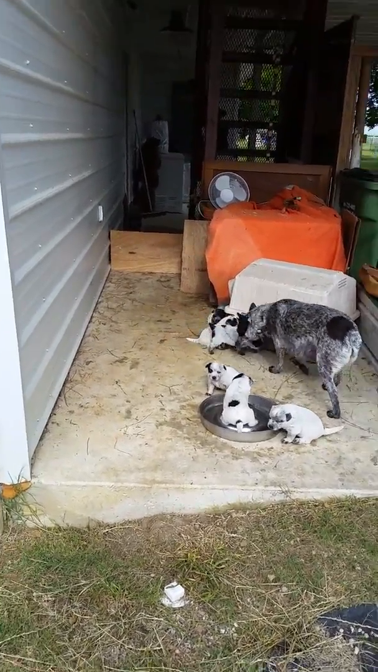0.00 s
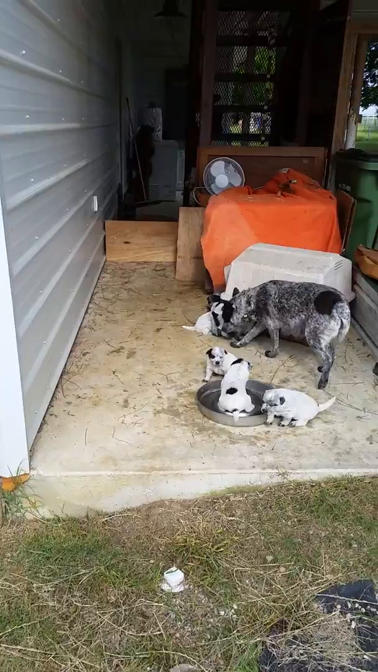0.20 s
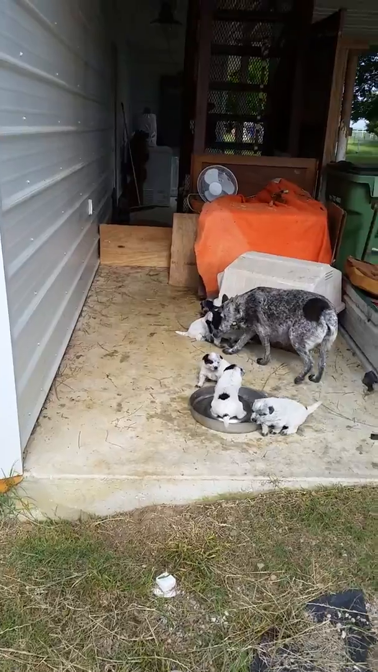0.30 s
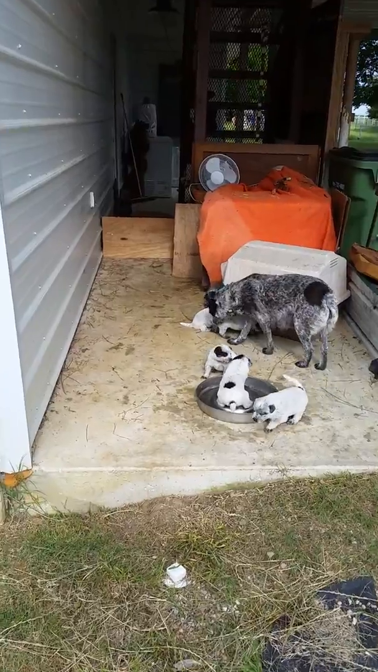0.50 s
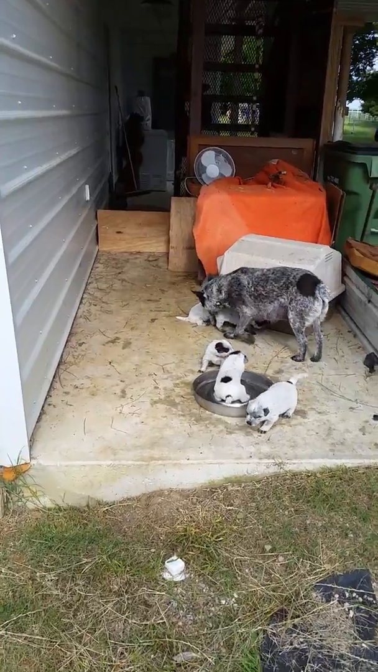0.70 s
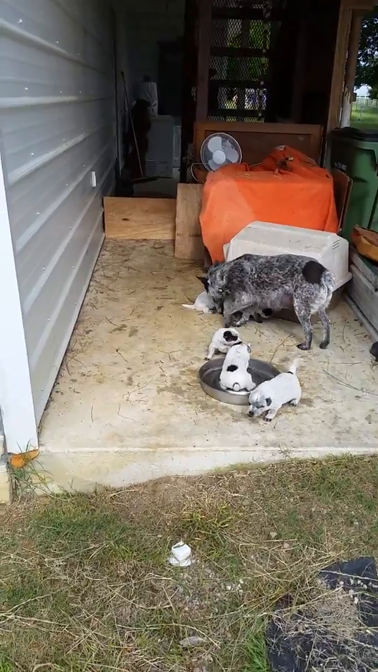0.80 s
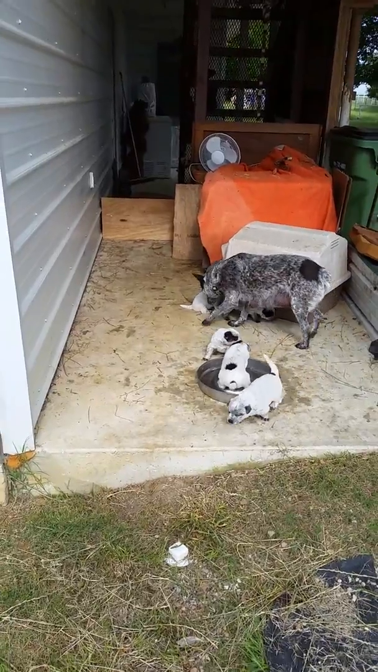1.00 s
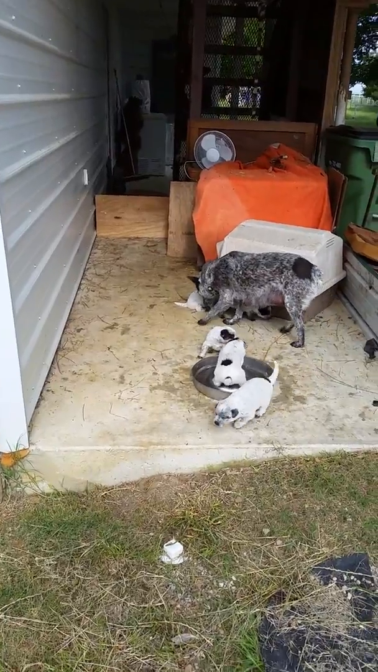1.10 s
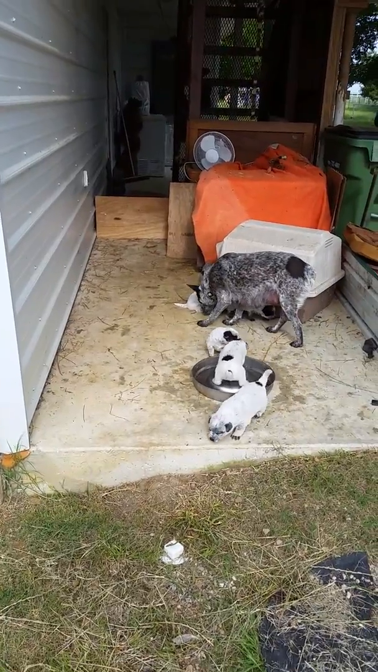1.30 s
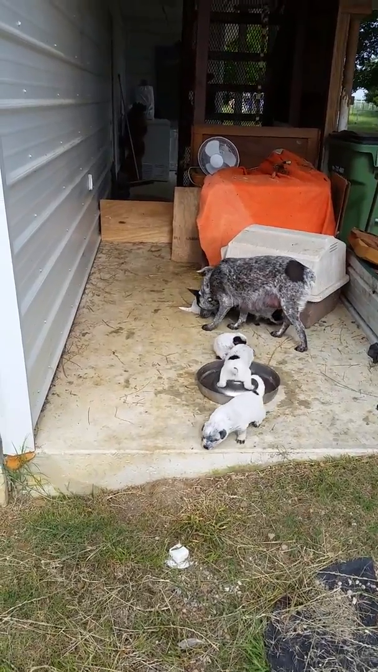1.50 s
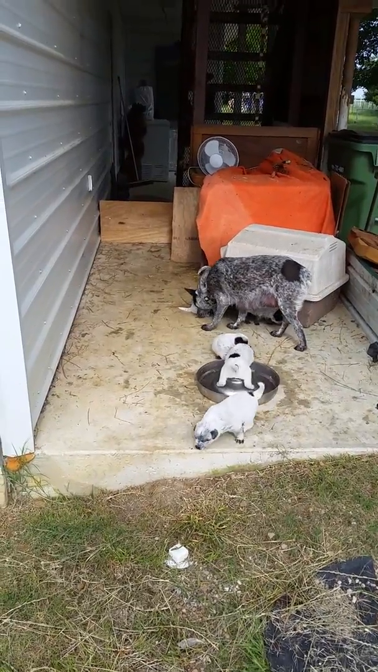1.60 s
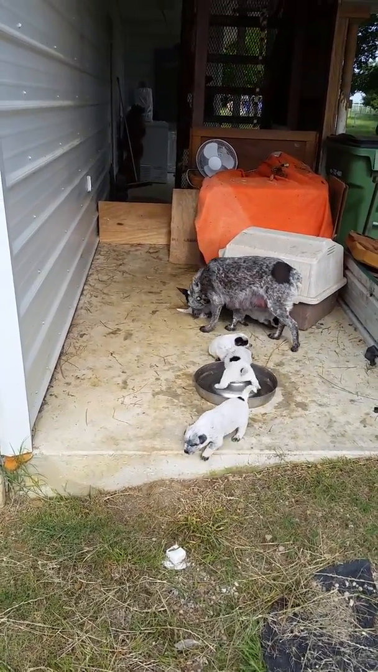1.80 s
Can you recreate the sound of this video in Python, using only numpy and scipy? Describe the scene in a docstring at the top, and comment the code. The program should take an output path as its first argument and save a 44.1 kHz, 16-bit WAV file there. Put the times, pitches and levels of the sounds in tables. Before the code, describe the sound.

Wind buffets the microphone outside an open shed. Separate low thumps from 0.1 seconds, with a faint airy whistle and bird peep near 0.3 to 0.4, crowd into a loud, growling rumble and hiss at 0.57 to 0.85. It drops away by 1.0. Faint puppy squeaks follow at 1.0, 1.08, 1.34 and 1.56, with soft bumps, a brief low hum near 1.4, and a distant bird sliding upward from 1.6.

```python
"""A puff of wind at a microphone outside an open shed

Turbulent eddies strike the microphone as paired pressure swings: thumps that crowd into a ragged rumble.
Shaped noise adds a hiss that swells with the air; narrow noise bands whistle briefly, and low tones growl.
A distant bird peeps early on. Afterwards puppies give four faint squeaks, made of gliding sines, soft bumps
and a low hum sound, and a bird slides upward over the steady noise murmur of the yard.
"""
import sys
import numpy as np
from scipy import signal
from scipy.fft import rfft, irfft
from scipy.io import wavfile

SR = 44100
rng = np.random.default_rng(int(sys.argv[2]) if len(sys.argv) > 2 else 0)


def store_pcm(level_fs):
    """Save levels as 16-bit WAV."""
    pcm = np.round(np.clip(level_fs, -1, 1) * 32767).astype(np.int16)
    wavfile.write(sys.argv[1], SR, np.atleast_2d(pcm).T)


N = 79380
TIME = np.arange(N) / SR
FREQS = np.maximum(np.fft.rfftfreq(N, 1 / SR), 1)

# Eddies hitting the microphone: (time [s], level before scaling [dB], scale: push first + / pull first - [ratio],
# half-width [ms], edge level relative to the swing [dB], left lag [ms])
EDDIES = [(0.1195, -27.5, 0.71, 1, -48, 0.74), (0.201, -18.5, 0.89, 0.58, -26, 0.89),
          (0.2264, -24, 0.94, 0.68, -31, 0.97), (0.3222, -15.5, 0.79, 0.62, -36.5, .8),
          (0.3349, -16.5, 0.81, 0.53, -22.5, 0.81), (0.4763, -23, 0.98, 0.78, -24.5, 0.45),
          (0.5729, -12.5, 1, 0.5, -19, 0.95), (0.5956, -7.5, 0.54, 0.48, -18, 0.86),
          (0.6165, -15, 0.95, 0.564, -12.5, 1), (0.642, -17, -1.1, 2.4, -27.5, 1),
          (0.6833, -10, -0.87, 0.5, -13.5, 0.94), (0.7909, -11, -0.026, 0.41, -15, 0.78)]
EDGE_BAND_HZ, EDGE_PAN_DB = (830, 1460), 1
PORT_LOW_HZ, LEFT_LOW_HZ, LEFT_SWING_DB = 44, 102, -4.5
WAKE_HZ, WAKE_T60_S, WAKE_DB = 108, 0.015, -2.5

# Turbulence strength: (time [s], gain below the split [dB], gain above the split [dB])
GUST_LEVEL = [(0, -38.5, -36), (.16, -46, -53.5), (.31, -44.5, -47.5), (.34, -29, -34), (0.421, -43.5, -44),
              (0.471, -26, -38), (0.518, -23, -28.5), (0.564, -32.5, -30.5), (.586, -20.5, -25.5),
              (0.602, -15.5, -8.5), (.626, -14, -8.5), (.644, -9.5, -3.5), (0.659, -0.5, -0.5),
              (0.699, -14, -11), (0.747, -3, 2.5), (0.784, -6, 1), (0.805, -13.5, -5), (.855, -22, -17),
              (0.887, -19.5, -13), (0.921, -35, -31.5), (1.04, -58, -31), (1.3, -62, -69)]
# Turbulence spectrum before that gain: (frequency [Hz], left density [dB per Hz], right density [dB per Hz])
RUMBLE_SPECTRUM = [(30, -86.5, -74), (84.5, -73, -50), (171, -57.5, -41.5), (313, -45, -49),
                   (550, -52.5, -45), (679, -51, -50.5), (790, -56, -59), (900, -55.5, -60.5),
                   (1065, -61, -65), (1400, -67, -68), (1560, -69, -70.5), (1880, -71.5, -72),
                   (2040, -87.5, -84.5), (3630, -97.5, -88), (5000, -104, -103), (7000, -108, -106),
                   (8300, -135, -128)]
SPLIT_HZ, RUMBLE_LAG_S, RUMBLE_SHARED = 760, 0.00088, 0.93
RAGGED_DB, RAGGED_HZ = 2.5, 90

# Growls of eddies shed in quick succession, one list each: (time [s], frequency [Hz], level [dB])
GROWLS = [
    [(.685, 160.6, -44), (.71, 194.6, -26), (.728, 227.6, -19.5), (.745, 305, -19), (.765, 323.5, -18.5),
     (.785, 328, -26.5), (.81, 321.4, -33), (.86, 318, -46)],
    [(.735, 560, -44), (.762, 508.5, -23.5), (.778, 471, -16), (.795, 491, -28), (.808, 456, -50.5)],
    [(.64, 557, -51), (.656, 570, -18), (.675, 540, -45)],
    [(.768, 147.1, -39.5), (.79, 121.7, -22), (.806, 120, -42)],
]
GROWL_WIDTH_HZ, GROWL_PAN_DB = 14, -4

# Airy hiss: (time [s], gain [dB])
HISS_LEVEL = [(0, 5.5), (.07, 7), (.18, 2), (.24, 3.5), (.33, 12), (.45, 7), (.57, 7), (.65, 13.5),
              (.70, 13.5), (.76, 17.5), (.87, 14), (1.0, 9), (1.11, 5), (1.19, 8), (1.27, 1.5),
              (1.52, -3.5), (1.66, -1), (1.8, 1)]
# Hiss spectrum before that gain: (frequency [Hz], left density [dB per Hz], right density [dB per Hz])
HISS_SPECTRUM = [(300, -116, -116), (1450, -108, -116), (2350, -112, -120), (3100, -117, -126),
                 (3880, -115, -126), (4770, -104, -125), (5740, -111, -129), (6690, -105, -128),
                 (7245, -115, -130), (8140, -139, -138), (10500, -135, -136), (11750, -124, -128),
                 (15000, -122, -126)]

# Breathy falling whistle: (time [s], frequency [Hz], level [dB])
AIR_WHISTLE = [(.24, 4700, -85.5), (.258, 4584, -64), (.285, 4043, -64.5), (.305, 3980, -58.5),
               (.325, 3500, -65), (.345, 3230, -63), (.365, 3005, -70.5), (.39, 2660, -92)]
# Thin high whistle: (time [s], frequency [Hz], level [dB])
THIN_WHISTLE = [(.285, 13000, -89), (.32, 14260, -76), (.345, 14440, -72), (.37, 14060, -66.5),
                (.39, 14260, -73.5), (.41, 14270, -78), (.50, 14250, -98)]
# Spray of hiss above the falling whistle: (time [s], gain [dB])
SPRAY_LEVEL = [(.235, -100), (.258, -70), (.29, -65.5), (.36, -84), (.42, -105), (.5, -120)]

# Tiny ticks: (time [s], level before colouring [dB], left minus right [dB])
TICKS = [(.448, -54, 11), (.521, -54.5, 5), (.5952, -45.5, -13), (.620, -54, -9.5), (1.175, -72, 17)]
# Tick colour: (frequency [Hz], gain [dB])
TICK_COLOUR = [(2000, -26), (4500, -4), (7000, -13), (8500, -26.5), (11500, -1.5), (15500, -1)]
TICK_DECAY_S = 0.00065

# Puppy squeaks: (start [s], length [s], first frequency [Hz], last frequency [Hz], level [dB])
SQUEAKS = [(1.005, 0.0444, 800, 1322, -57), (1.077, 0.049, 1090, 1105, -62), (1.341, 0.037, 992, 994, -69),
           (1.559, 0.037, 970, 1008, -69.5)]
SQUEAK_OVERTONE_DB, SQUEAK_PAN_DB, SQUEAK_ROUGH_DB = -15, 5, 2
# Soft low bumps: (time [s], level [dB])
BUMPS = [(1.02, -35), (1.191, -43.5)]
BUMP_HZ, BUMP_T60_S, BUMP_ATTACK_S = 209, 0.029, 0.0031

# Rising bird call: (time [s], frequency [Hz], level [dB])
BIRD_SLIDE = [(1.61, 2100, -92), (1.69, 2360, -84.5), (1.715, 2560, -85), (1.745, 2790, -78),
              (1.785, 2860, -76.5), (1.83, 3200, -68)]
# Short bird peep: (time [s], frequency [Hz], level [dB])
BIRD_PEEP = [(.375, 1980, -90), (.388, 1794, -61.5), (.404, 1780, -81)]
ECHO_T60_S, ECHO_DB = 0.64, -10

# Brief low hum: (time [s], frequency [Hz], level [dB])
LOW_HUM = [(1.37, 235, -79), (1.41, 238, -59.5), (1.45, 233.6, -66), (1.51, 237, -75), (1.56, 234, -81)]
# Still air in the yard: (frequency [Hz], left density [dB per Hz], right density [dB per Hz])
YARD_SPECTRUM = [(25, -77, -95), (67, -82, -73.5), (129.6, -81.5, -77), (195, -87, -100.5),
                 (229, -86.5, -82.5), (310, -93.5, -97), (600, -101, -107), (1100, -106, -112),
                 (1400, -102, -111), (1830, -112, -118), (3020, -126, -130), (8000, -142, -137)]
CUTOFF_HZ = 15900


def from_db(db):
    """Decibel definition: an amplitude ratio is ten to the power dB / 20."""
    return 10 ** (np.asarray(db) / 20)


def butter(x, hz, kind, order=2):
    """Butterworth filtering: a maximally flat passband."""
    return signal.sosfilt(signal.butter(order, hz, kind, fs=SR, output="sos"), x)


def panned(x, pan_db):
    """Level-difference stereo: left is louder than right by pan_db."""
    return x * from_db([[pan_db / 2], [-pan_db / 2]])


def drift(corner_hz):
    """Random modulation: low-passed noise scaled to unit RMS."""
    x = irfft(rfft(rng.standard_normal(N)) / (1 + (FREQS / corner_hz) ** 2), N)
    return x / np.sqrt(np.mean(x ** 2) + 1e-20)


def level(times, db):
    """Envelope: gain interpolated linearly in decibels."""
    return from_db(np.interp(TIME, times, db))


def decay(age, t60_s):
    """Exponential damping: a fall of 60 dB in t60_s."""
    return np.exp(-np.log(1000) * age / t60_s)


def coloured(white, spectrum):
    """Spectral shaping: two white noises take a left and a right power density."""
    hz, *sides = np.transpose(spectrum)
    gains = from_db([np.interp(np.log(FREQS), np.log(hz), side) for side in sides])
    return irfft(rfft(white) * gains, N) * np.sqrt(SR / 2)


def whistle(points, width_hz, noisy, pan_db):
    """Modulated carrier: a gliding tone, from pure (noisy 0) to a noise band around the pitch (noisy 1)."""
    times, hz, db = np.transpose(points)
    carrier = np.exp(2j * np.pi * np.cumsum(np.interp(TIME, times, hz)) / SR)
    flutter = np.array([drift(width_hz) + 1j * drift(width_hz) for side in range(2)])
    tone = np.real(carrier * (np.sqrt(2 * (1 - noisy)) + np.sqrt(noisy) * flutter))
    sounding = (TIME > times[0]) * (TIME < times[-1])
    return panned(tone * level(times, db) * sounding, pan_db)


def eddies():
    """Pressure dipole: each eddy pushes and pulls, with a sharper edge and a low wake, right port first."""
    out = np.zeros((2, N))
    for time, db, sign, width_ms, edge_db, lag_ms in EDDIES:
        age = TIME - time - np.array([[lag_ms], [0]]) / 1000
        u = age * 1000 / width_ms
        after = np.maximum(age, 0)
        wake = np.sin(2 * np.pi * WAKE_HZ * after) * decay(after, WAKE_T60_S)
        # Derivative of a Gaussian, with extremes of 1 at u = -1 and u = 1
        swing = -u * np.exp((1 - u * u) / 2) - from_db(WAKE_DB) * wake
        swing[0] = from_db(LEFT_SWING_DB) * butter(swing[0], LEFT_LOW_HZ, "high", order=1)
        # The edge comes just ahead of the swing
        edge = butter(np.exp(-(4 * (u + 3)) ** 2), EDGE_BAND_HZ, "band", order=5)
        edge *= from_db(edge_db) / np.abs(edge).max()
        out += sign * from_db(db) * (swing + panned(edge, EDGE_PAN_DB))
    return butter(out, PORT_LOW_HZ, "high", order=1)


def gust():
    """Partial coherence: ragged turbulence mostly shared by the two ports, a little later on the left."""
    right, own = rng.standard_normal((2, N))
    shared = RUMBLE_SHARED / np.sqrt(1 + (FREQS / 2200) ** 4)
    lag = np.exp(-2j * np.pi * FREQS * RUMBLE_LAG_S)
    left = irfft(shared * rfft(right) * lag + np.sqrt(1 - shared ** 2) * rfft(own), N)
    rumble = coloured(np.array([left, right]), RUMBLE_SPECTRUM)
    low = irfft(rfft(rumble) / (1 + (FREQS / SPLIT_HZ) ** 6), N)
    high = rumble - low
    times, low_db, high_db = np.transpose(GUST_LEVEL)
    blown = low * level(times, low_db) + high * level(times, high_db)
    return blown * from_db(RAGGED_DB * drift(RAGGED_HZ))


def growl():
    """Periodic eddy shedding: unsteady low tones stand out as the gust peaks."""
    right = np.zeros(N)
    for points in GROWLS:
        times, hz, db = np.transpose(points)
        pitch = np.interp(TIME, times, hz) + GROWL_WIDTH_HZ * drift(60)
        tone = np.sin(2 * np.pi * np.cumsum(pitch) / SR)
        unsteady = from_db(2.5 * drift(66))
        right += tone * level(times, db) * unsteady * (TIME > times[0]) * (TIME < times[-1])
    left = np.interp(TIME - RUMBLE_LAG_S, TIME, right)
    return panned(np.array([left, right]), GROWL_PAN_DB)


def hiss():
    """Broadband flow noise: a smooth hiss swells with the breeze."""
    return coloured(rng.standard_normal((2, N)), HISS_SPECTRUM) * level(*np.transpose(HISS_LEVEL))


def wind_whistles():
    """Narrow-band noise: a breathy falling whistle under a spray of hiss, then a very thin high one."""
    falling = whistle(AIR_WHISTLE, width_hz=340, noisy=1.0, pan_db=20.5)
    falling = butter(falling, 6500, "low", order=6)
    spray = butter(rng.standard_normal(N), (4300, 7000), "band", order=8)
    spray *= level(*np.transpose(SPRAY_LEVEL))
    thin = whistle(THIN_WHISTLE, width_hz=90, noisy=1.0, pan_db=17)
    return falling + panned(spray, 31) + thin


def ticks():
    """Impulsive noise: very short bright specks start at once and decay exponentially."""
    out = np.zeros((2, N))
    for time, db, pan_db in TICKS:
        fade = (TIME >= time) * np.exp(-np.abs(TIME - time) / TICK_DECAY_S)
        out += panned(from_db(db) * fade * rng.standard_normal((2, N)), pan_db)
    hz, db = np.transpose(TICK_COLOUR)
    return irfft(rfft(out) * from_db(np.interp(np.log(FREQS), np.log(hz), db)), N)


def squeaks():
    """Harmonic voice: a short gliding fundamental with a weak octave, roughened in pitch and level."""
    out = np.zeros(N)
    for start, length, first_hz, last_hz, db in SQUEAKS:
        u = np.clip((TIME - start) / length, 0, 1)
        pitch = (first_hz + (last_hz - first_hz) * u) * (1 + 0.0233 * drift(131))
        phase = 2 * np.pi * np.cumsum(pitch) / SR
        voice = np.sin(phase) + from_db(SQUEAK_OVERTONE_DB) * np.sin(2 * phase)
        out += from_db(db + SQUEAK_ROUGH_DB * drift(120)) * np.sin(np.pi * u) * voice
    return panned(out, SQUEAK_PAN_DB)


def bumps():
    """Damped oscillation: a low sine with a soft onset dies away exponentially."""
    out = np.zeros(N)
    for time, db in BUMPS:
        age = np.maximum(TIME - time, 0)
        onset = 1 - np.exp(-age / BUMP_ATTACK_S)
        out += from_db(db) * np.sin(2 * np.pi * BUMP_HZ * age) * decay(age, BUMP_T60_S) * onset
    return panned(out, SQUEAK_PAN_DB)


def birds():
    """Frequency glide: far, nearly pure notes, one peep and one upward slide."""
    slide = whistle(BIRD_SLIDE, width_hz=75, noisy=0.35, pan_db=9)
    return slide + whistle(BIRD_PEEP, width_hz=70, noisy=0.35, pan_db=4.5)


def shed(x):
    """Diffuse reverberation: convolution with decaying noise of unit energy adds the shed's short echo."""
    tail = rng.standard_normal((2, N)) * decay(TIME, ECHO_T60_S)
    tail /= np.sqrt(np.sum(tail ** 2, axis=1, keepdims=True))
    return x + from_db(ECHO_DB) * signal.fftconvolve(x, tail, axes=1)[:, :N]


def low_hum():
    """Partly coherent tone: a steady sine and a narrow noise band share one low pitch."""
    return whistle(LOW_HUM, width_hz=11, noisy=0.5, pan_db=4)


def yard():
    """Stationary background noise: the steady murmur of still air in the yard."""
    return coloured(rng.standard_normal((2, N)), YARD_SPECTRUM)


def scene():
    """Superposition: the pressures of all sources add, the whistles and birds with the shed's echo."""
    wind = eddies() + gust() + growl() + hiss()
    echoed = shed(wind_whistles() + birds())
    return wind + echoed + ticks() + squeaks() + bumps() + low_hum() + yard()


def record(dry):
    """Band limitation: a steep elliptic low-pass cuts the top."""
    return signal.sosfilt(signal.ellip(10, .1, 70, CUTOFF_HZ, fs=SR, output="sos"), dry)


dry = scene()
out = record(dry)
store_pcm(out)
```